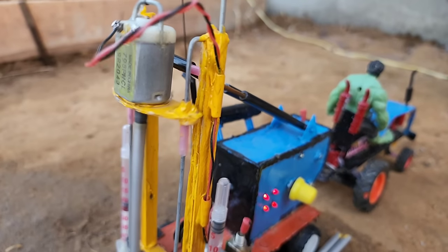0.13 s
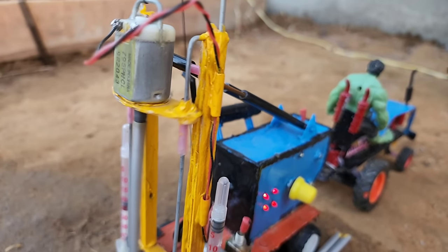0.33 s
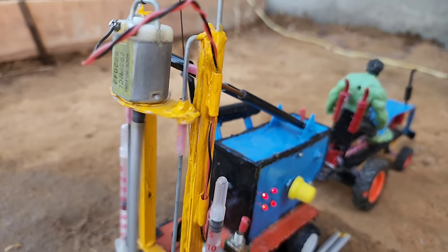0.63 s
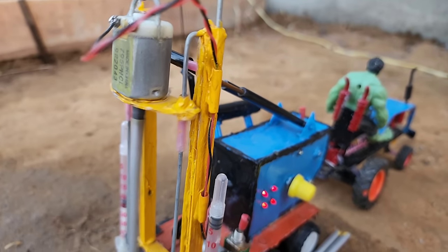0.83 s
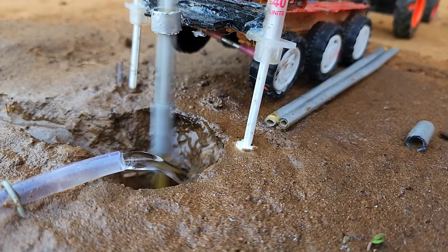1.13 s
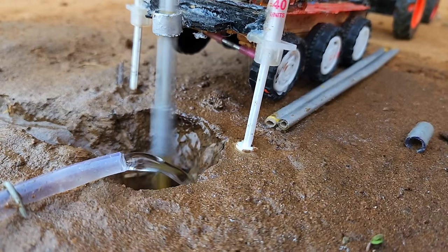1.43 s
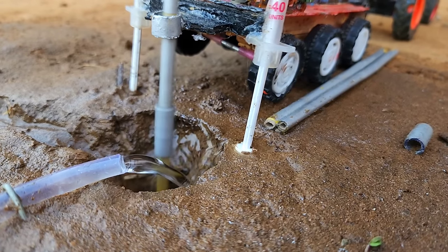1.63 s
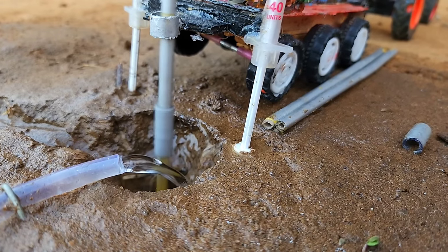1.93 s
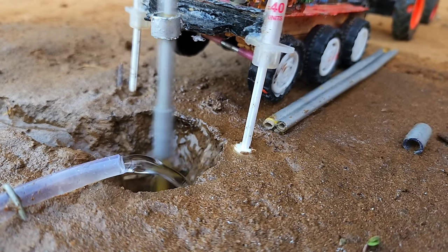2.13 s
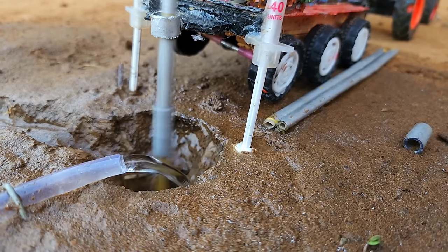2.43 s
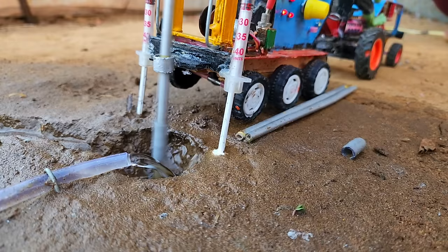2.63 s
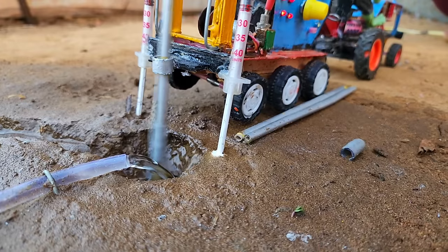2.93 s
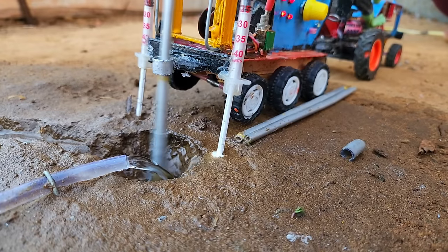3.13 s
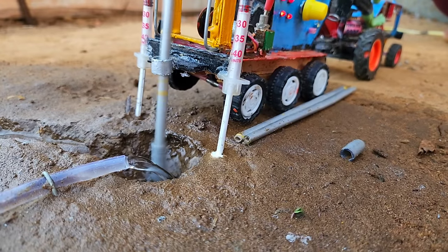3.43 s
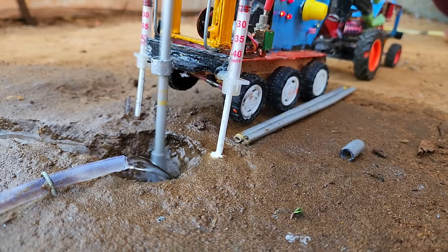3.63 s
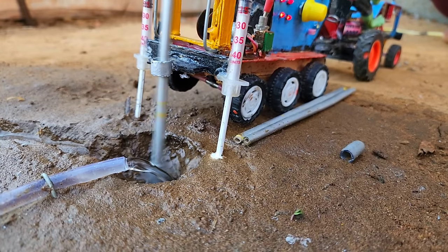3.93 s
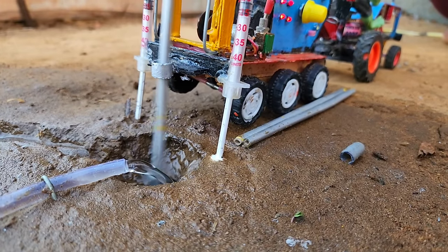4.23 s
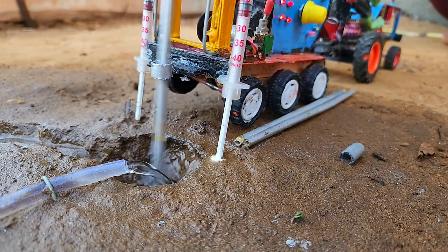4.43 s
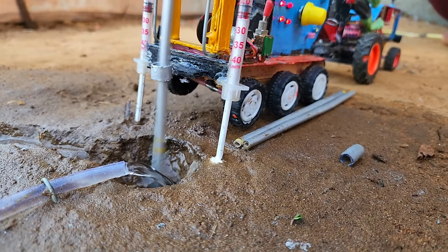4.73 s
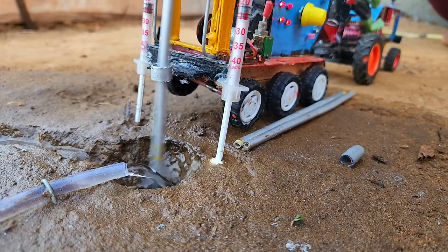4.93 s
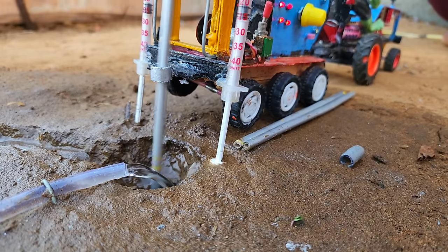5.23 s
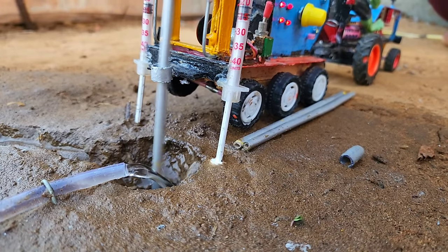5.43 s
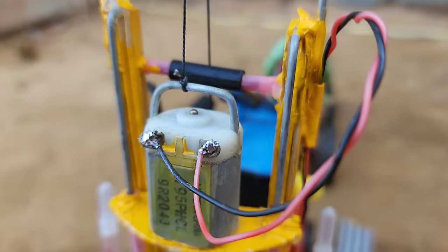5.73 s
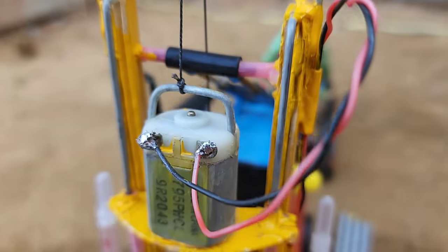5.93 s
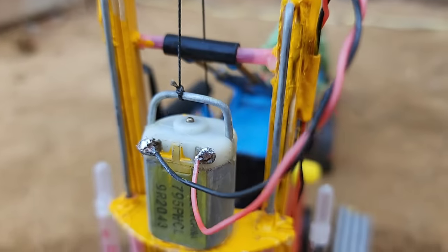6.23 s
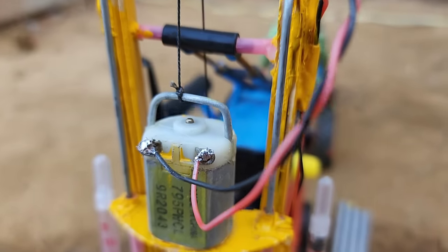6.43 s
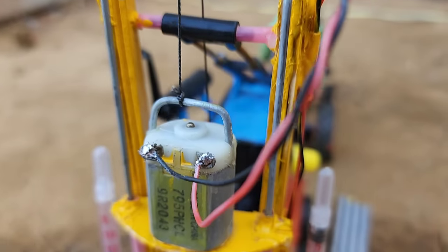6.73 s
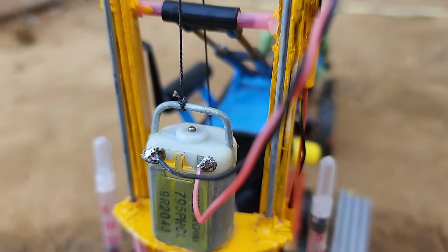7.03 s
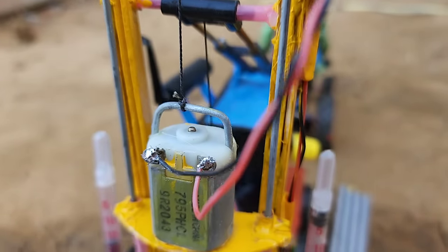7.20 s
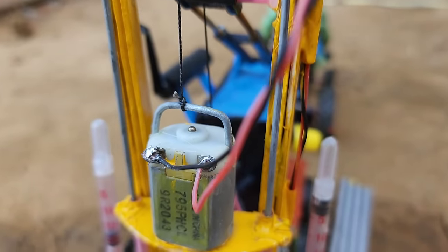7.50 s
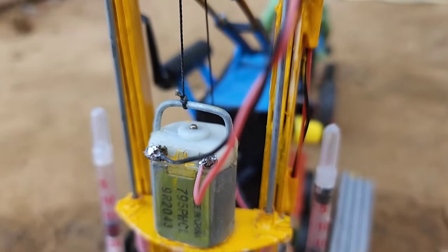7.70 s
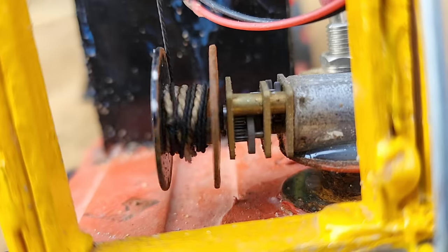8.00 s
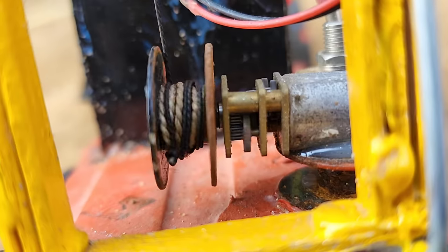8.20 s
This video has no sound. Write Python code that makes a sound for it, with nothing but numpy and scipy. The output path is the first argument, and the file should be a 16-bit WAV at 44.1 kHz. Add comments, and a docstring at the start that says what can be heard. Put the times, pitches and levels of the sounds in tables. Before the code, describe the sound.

In a quiet open yard, a toy drilling rig's little motor hums steadily, its loose rod chattering fast in the frame with fine brush crackle. After nearly six seconds a geared winch starts with a ringing kick, clatter and scraping, then whines much louder. The whine pulses as a load bounces, throbs gently, and changes colour near the end. Close microphone, dry, narrow stereo.

```python
"""A toy drilling rig works in wet sand, heard close up over faint yard air.
From the start a small DC motor hums, its loose rod knocks in the frame every turn, its brushes crackle.
At 5.8 s a geared winch motor starts with jolts and a scrape, and its tooth-rate whine spins up.
The string snaps taut at 5.9 s and the bouncing load pumps the whine; near 7 s the load sways and it throbs.
Around 7.4 s the whine changes colour as the microphone moves; a high side tone grows to the end."""
import sys
import numpy as np
from scipy import signal
from scipy.fft import rfft, irfft
from scipy.io import wavfile
from scipy.ndimage import uniform_filter1d

SR = 44100
rng = np.random.default_rng(int(sys.argv[2]) if len(sys.argv) > 2 else 0)


def output_pcm(signal):
    """Save a mono or channel-first signal as 16-bit PCM at the path in sys.argv[1].

    Samples are clipped to [-1, 1] before scaling.
    """
    pcm = np.clip(np.atleast_2d(signal).T, -1, 1) * 32767
    wavfile.write(sys.argv[1], SR, np.round(pcm).astype(np.int16))


N = 368676
TIME_S = np.arange(N) / SR


def gain_of(db):
    """Decibels to amplitude."""
    return 10 ** (np.asarray(db) / 20)


def evened(x):
    """Scale to rms 1."""
    return x / np.sqrt(np.mean(x ** 2) + 1e-20)


def curves(rows):
    """Interpolate each table column over time, sample by sample."""
    time_s, *columns = np.transpose(rows)
    return [np.interp(TIME_S, time_s, column) for column in columns]


def sine(cycles):
    """Sine of a phase in cycles."""
    return np.sin(2 * np.pi * cycles)


def wander(rate_hz):
    """Gaussian-lowpassed noise of rms 1, up to about rate_hz."""
    freq_hz = np.fft.rfftfreq(N, 1 / SR)
    spectrum = rfft(rng.standard_normal(N)) * np.exp(-(freq_hz / rate_hz) ** 2)
    return evened(irfft(spectrum, N))


def coloured(x, points, size=4096):
    """Minimum-phase filter with the given spectrum shape, scaled to unit energy."""
    point_hz, point_db = np.transpose(points)
    freq_hz = abs(np.fft.fftfreq(size, 1 / SR))
    shape_db = np.interp(np.log(freq_hz + 1), np.log(point_hz), point_db)
    log_gain = np.log(gain_of(shape_db))
    min_phase = np.exp(np.conj(signal.hilbert(log_gain)))
    response = np.fft.ifft(min_phase).real[:size // 2]
    return signal.oaconvolve(x, response / np.linalg.norm(response))[:N]


def resonate(x, freq_hz, width_hz):
    """One resonance of peak gain 1."""
    return signal.lfilter(*signal.iirpeak(freq_hz, freq_hz / width_hz, SR), x)


def ring_out(start_s, decay_s):
    """Sudden start, then exponential fall."""
    return (TIME_S >= start_s) * np.exp(-np.maximum(TIME_S - start_s, 0) / decay_s)


def partials(turns, orders, waver_db, waver_hz):
    """Lines on multiples of a rotation, each wavering in strength; rms 1 in sum."""
    total = np.zeros(N)
    for order, rel_db in orders:
        strength = gain_of(rel_db + waver_db * wander(waver_hz))
        total += strength * sine(round(order) * turns + rng.random())
    return evened(total)


# drill motor: time_s, turns_per_s
DRILL_SPEED = [(0.1, 55.76), (0.7, 55.68), (1.3, 55.59), (1.7, 55.62), (2.0, 56.05), (2.7, 56.08),
               (3.3, 56.02), (4.3, 55.9), (5.6, 55.79)]
# motor hum: multiple_of_shaft_rate, rel_db
DRILL_ORDERS = [(1, -24), (2, -16), (3, 2.5), (4, -2.5), (5, -6.5), (6, -11.5), (7, 2.5), (8, -5.5),
                (9, -5.5), (10, -5), (11, -6.5), (12, -12), (13, -12.5), (14, -15.5), (15, -33), (16, -7.5),
                (17, -3.5), (18, -4), (19, -28), (20, -28)]
# rod striking its guide: place_in_turn (0-1), rel_db, decay_s
ROD_CONTACTS = [(0.33, -5.5, 0.002), (0.74, 0.5, 0.0008), (0.79, 0.5, 0.0013), (0.93, -1.5, .0009)]
# hardest rod knocks: start_s, rel_db
HARD_KNOCKS = [(0.0314, -17), (0.3716, -15.5), (0.4962, -14), (0.5696, -16.5), (0.9472, -19), (2.0413, -14),
               (2.6481, -16.5), (3.7549, -16), (3.9515, -13), (5.0442, -15.5), (5.2048, -13),
               (5.4018, -14.5)]
# frame resonances: freq_hz, width_hz, rel_db
FRAME = [(1022, 137, -12.5), (1403, 72, -5), (1652, 237, -11), (1891, 79, -5.5), (2490, 80, -3.5),
         (2737, 47, -3), (3203, 98, -10.5), (4330, 460, -13.5), (4550, 1310, -17), (5000, 370, -17.5)]
# dry clack of the rod: freq_hz, rel_db_per_hz
CLACK = [(300, -23.5), (750, -17.5), (1050, -7.5), (1450, 1), (1900, 0.5), (2200, -16), (2680, 1),
         (3300, -8), (5000, -17), (12000, -42)]
# brushes crossing commutator gaps: place_in_turn (0-1), rel_db, decay_s
BRUSH_CONTACTS = [(.23, -11, .002), (.315, 3.5, .0004), (.38, -10, .003), (.53, 0, .0009), (.58, -1, .0009),
                  (.72, -9, .003)]
# brush crackle: freq_hz, rel_db_per_hz
SPARK = [(1500, -25), (4000, -3), (5300, -1), (7000, -5.5), (8700, -1), (10300, -3.5), (12500, 1),
         (15500, 1)]
HUM_DB, CLACK_DB = -45, -34.5
FRAME_LEFT_RIGHT_DB, CRACKLE_LEFT_RIGHT_DB = [[-32.3], [-32.9]], [[-39.2], [-41.5]]
HARD_KNOCK_DECAY_S = 0.0012


def drill():
    """Unbalance hums, the rod knocks in the frame and the brushes spark, all locked to the shaft."""
    turns = np.cumsum(curves(DRILL_SPEED)[0]) / SR
    hum = from_left(gain_of(HUM_DB) * partials(turns, DRILL_ORDERS, waver_db=1.0, waver_hz=2.9))

    # the rod grips and slips in the sand, so the knocking swells a little
    contact = chatter(turns, ROD_CONTACTS, scatter_db=1.5, jitter_turns=0.012) + 0.14
    knocking = gain_of(0.86 * wander(6.9)) * contact
    hard = sum(gain_of(rel_db + 32) * ring_out(start_s, HARD_KNOCK_DECAY_S)
               for start_s, rel_db in HARD_KNOCKS)
    strength = np.hypot(knocking, hard)

    knocks = at_ports(strength, direct=0.53, impact=5.2)
    frame = np.zeros((2, N))
    for k, (freq_hz, width_hz, rel_db) in enumerate(FRAME):
        # neighbouring modes alternate in sign
        frame += (-1) ** k * gain_of(rel_db) * resonate(knocks, freq_hz, width_hz)
    # the small frame radiates little bass
    frame = signal.sosfilt(signal.butter(2, 850, "high", fs=SR, output="sos"), frame)

    taps = at_ports(strength, direct=0.71, impact=1.05)
    clack = evened(np.array([coloured(port, CLACK) for port in taps]))

    # crackle strength, smoothed over 28 samples; brush pressure drifts
    contact = chatter(turns, BRUSH_CONTACTS, scatter_db=3.1, jitter_turns=0.012)
    smoothed = uniform_filter1d(contact, size=28)
    sparks = at_ports(gain_of(1.15 * wander(24)) * (smoothed + 0.17), direct=0.05, impact=0)
    crackle = evened(np.array([coloured(port, SPARK) for port in sparks]))

    rod = gain_of(FRAME_LEFT_RIGHT_DB) * evened(frame) + gain_of(CLACK_DB) * clack
    return hum + rod + gain_of(CRACKLE_LEFT_RIGHT_DB) * crackle


def chatter(turns, contacts, scatter_db, jitter_turns):
    """Contact strength, rms 1: each place is struck once a turn, never quite alike, and dies away."""
    turn = np.arange(int(turns[-1]) + 1)
    power = np.zeros(N)
    for place, rel_db, decay_s in contacts:
        late, force = np.clip(rng.standard_normal((len(turn), 2)), -2, 2).T
        at = np.searchsorted(turns, turn + place + jitter_turns * late)
        blow_power = gain_of(rel_db + scatter_db * force) ** 2
        blows = np.bincount(at, blow_power, N + 1)[:N]
        # power falls twice as fast as amplitude
        power += signal.lfilter([1], [1, -np.exp(-2 / (decay_s * SR))], blows + 1e-12)
    return evened(np.sqrt(power))


def at_ports(strength, direct, impact):
    """Blows and scraping at two ports: the direct share reaches the left first, the rest is scattered."""
    shared, left, right = strength * rng.standard_normal((3, N))
    # every jump in strength is a clean blow
    jumps = np.maximum(np.diff(strength, prepend=strength[0]), 0)
    shared = shared + impact * jumps
    return np.sqrt(direct) * from_left(shared) + np.sqrt(1 - direct) * np.array([left, right])


PORT_LAG_SAMPLES = 6


def from_left(x):
    """A sound that reaches the right port a few samples late."""
    return np.array([x, np.roll(x, PORT_LAG_SAMPLES)])


# tone at the tooth rate, before the offset and the strain, bounce, throb, flutter: time_s, base_db
TONE_LEVEL = [(6.2, -17), (6.41, -16), (6.43, -20), (6.79, -21.5), (6.82, -26), (6.85, -20), (7.21, -15.5),
              (7.74, -14), (8.34, -15)]
TONE_OFFSET_DB, STRAIN_DB, THROB_DB = 3.0, 6, 0.9
FLUTTER_DB, STRAIN_FLUTTER_DB = 0.8, 1.6
# the string snaps taut and the load bounces on it, pumping the tone less and less
TAUT_S, BOUNCE_HZ, BOUNCE_DB, BOUNCE_DECAY_S = 5.935, 11.7, 11, 0.16
# widest sway of the load, its rate, and its spread either side
SWAY_PEAK_S, SWAY_HZ, SWAY_SPREAD_S = 6.957, 10.15, 0.29
# low overtones together: time_s, base_db
LOW_LEVEL = [(6.17, -26.5), (6.22, -30), (7.08, -29), (7.35, -34.5), (7.81, -26), (7.95, -37),
             (7.98, -36.5), (8.34, -32)]
# low overtones: multiple_of_tooth_rate, early_rel_db, late_rel_db
LOW_OVERTONES = [(2, 0.5, -4.5), (3, -4, -7), (4, -8, -4)]
# high overtones: multiple_of_tooth_rate, early_db, late_db
OVERTONES = [(5, -41, -40.5), (6, -43, -42), (8, -48, -44), (9, -42, -40.5), (10, -46, -43.5),
             (11, -35.5, -40.5), (12, -45, -42.5), (13, -46, -47), (14, -48, -45), (15, -49.5, -49),
             (17, -54, -56), (19, -53.5, -57), (20, -53, -57)]
# gears scraping as they gather speed: multiple_of_tooth_rate, rel_db
SCRAPE = [(2, 12), (3, -5), (4, 6), (5, -8), (6, -20), (7, -17), (8, -17), (9, -10), (10, -6), (11, -8),
          (12, -1), (13, -4.5)]
# lines of the uneven pinion: multiple_of_shaft_rate, rel_db
SHAFT_ORDERS = [(5, -8), (7, -6.5), (8, -3.5), (9, -32), (10, -2), (12, -19), (13, -14), (20, -20), (21, 4),
                (24, -25), (26, -31), (27, 4)]
# pinion side tone: time_s, level_db
SIDE_TONE = [(7.9, -56), (8.05, -44), (8.36, -30)]
PINION_TEETH, SIDE_ORDER = 11, 24
# gear grinding: freq_hz, rel_db_per_hz
GRIND = [(25, -9), (90, -3), (250, -2), (430, 0.5), (570, 15), (760, -5), (1080, -0.5), (1650, -3.5),
         (2100, -0.5), (2750, 3.5), (3700, -2.5), (5500, -7.5), (8000, -11.5), (11500, -22.5), (15000, -28)]
# grinding eases steadily as the gears run in
GRIND_START_DB, GRIND_EASE_DB_PER_S, GRIND_STRAIN_DB = -28, 0.85, 2.3


def winch():
    """Pinion teeth mesh in a whine with overtones; the load bounces, then sways, and makes it throb."""
    start_s = JOLTS[0][0]
    # torque is high while the rotor gathers speed, and the gears scrape more than they sing
    strain = ring_out(start_s, decay_s=0.1545)
    meshing = 1 - ring_out(start_s, decay_s=0.098)
    eased = (1 - strain) ** 2

    # the bounce begins half a cycle before its peak
    bounce = ring_out(TAUT_S - 0.5 / BOUNCE_HZ, BOUNCE_DECAY_S)
    bounce = bounce * np.cos(2 * np.pi * BOUNCE_HZ * (TIME_S - TAUT_S))
    from_peak_s = TIME_S - SWAY_PEAK_S
    swing = np.exp(-(from_peak_s / SWAY_SPREAD_S) ** 2) * np.cos(2 * np.pi * SWAY_HZ * from_peak_s)
    # plus irregular sway throughout
    sway = swing + 0.45 * evened(resonate(rng.standard_normal(N), 10.8, 11.0))

    teeth = spin(start_s, strain, sway)
    pinion = teeth / PINION_TEETH

    tone_db = curves(TONE_LEVEL)[0] + TONE_OFFSET_DB
    tone_db = tone_db + STRAIN_DB * strain + BOUNCE_DB * bounce + THROB_DB * sway
    tone_db = tone_db + (FLUTTER_DB + STRAIN_FLUTTER_DB * strain) * wander(32)
    tone = meshing ** 2 * gain_of(tone_db) * np.sin(2 * np.pi * teeth + 0.057 * wander(37))

    octave, *others = (overtone(teeth, *row, flutter_db=3.0, drift_db=0.64) for row in LOW_OVERTONES)
    # the octave beats most deeply with the sway
    low = octave * (1 + 0.81 * sway) + sum(others) * (1 + 0.2 * sway)
    low = gain_of(curves(LOW_LEVEL)[0]) * low
    high = sum(overtone(teeth, *row, flutter_db=2.5, drift_db=2.2) for row in OVERTONES)

    # straining teeth catch and slip, which smears their lines
    slipping = partials(teeth + 0.045 * wander(110), SCRAPE, waver_db=4, waver_hz=60)
    scrape = gain_of(-27.0) * strain * slipping

    shaft = partials(pinion, SHAFT_ORDERS, waver_db=3.0, waver_hz=1.8)
    shaft = gain_of(-37.5 + 10 * strain) * shaft
    side_tone = gain_of(curves(SIDE_TONE)[0]) * sine(SIDE_ORDER * pinion)

    grind_db = GRIND_START_DB - GRIND_EASE_DB_PER_S * (TIME_S - start_s) + GRIND_STRAIN_DB * strain
    grind = gain_of(grind_db) * evened(coloured(flanks(teeth), GRIND))

    running = np.clip((TIME_S - start_s) / 0.0044, 0, 1)
    return running * (tone + eased * (low + high) + scrape + shaft + side_tone + grind)


# running speed under load: time_s, tooth_rate_hz
RUNNING_SPEED = [(6.0, 556), (6.12, 561.5), (6.3, 562.4), (6.42, 564.5), (7.25, 563.7), (7.76, 565.1),
                 (7.87, 566.4), (8.36, 566.6)]
# the winch starts at a share of its running speed and closes the gap exponentially
START_SHARE, SPIN_UP_S = 0.445, 0.05


def spin(start_s, strain, sway):
    """Teeth passed so far: the motor spins up, and its speed flutters with strain and sway."""
    spin_up = 1 - (1 - START_SHARE) * ring_out(start_s, SPIN_UP_S)
    rate_hz = curves(RUNNING_SPEED)[0] * spin_up
    flutter = 0.0017 * sway + (0.0016 + 0.044 * strain) * wander(77)
    return np.cumsum(rate_hz * (1 + flutter)) / SR


# the whine changes colour around this time, over this long, as the microphone moves
MOVE_S, MOVE_SPREAD_S = 7.43, 0.13


def overtone(teeth, multiple, early_db, late_db, flutter_db, drift_db):
    """One multiple of the tooth rate; it flutters, drifts, and shifts level as the microphone moves."""
    moved = 0.5 + 0.5 * np.tanh((TIME_S - MOVE_S) / MOVE_SPREAD_S)
    level_db = early_db + (late_db - early_db) * moved
    level_db = level_db + flutter_db * wander(37) + drift_db * wander(9.9)
    return gain_of(level_db) * sine(round(multiple) * teeth + rng.random())


def flanks(teeth, size=800):
    """Tooth flanks rub: their roughness recurs with every pinion turn, the rest is chance."""
    profile = rng.standard_normal(size)
    roughness = np.interp(teeth / PINION_TEETH, np.arange(size) / size, profile, period=1)
    rubbing = 0.4 * evened(roughness) + rng.standard_normal(N)
    # hardest as each tooth engages
    engaging = 1 + 0.5 * np.cos(2 * np.pi * teeth)
    return rubbing * engaging * gain_of(1.6 * wander(100))


# gears and string taking up slack: start_s, rattle_db, decay_s, thump_db (relative to rattle_db)
JOLTS = [(5.799, -28, 0.021, -14), (5.901, -17, 0.074, -1), (5.936, -13, 0.029, -4),
         (6.088, -17.5, 0.044, -13)]
# jolt clatter: freq_hz, rel_db_per_hz
CLATTER = [(30, -30), (90, -14), (200, 1), (320, 4.5), (620, 6.5), (780, -2.5), (1000, 1.5), (2700, -0.5),
           (4200, -9), (6000, -22), (12000, -53)]
# winch mount ringing at the kick: freq_hz, level_db, t60_s
MOUNT = [(404, -21, 0.55), (620, -10.5, 0.2), (3750, -19, 0.054), (4130, -24, 0.074)]
THUMP_HZ = 185


def jolts():
    """Each jolt clatters unevenly and thumps through the mast; the first, a kick, rings the mount."""
    out = np.zeros(N)
    for start_s, rattle_db, decay_s, thump_db in JOLTS:
        blow = ring_out(start_s, decay_s) - ring_out(start_s, decay_s=0.00055)
        rattle = gain_of(rattle_db + 2.8 * wander(350)) * blow * rng.standard_normal(N)
        thump = ring_out(start_s, decay_s=0.03) - ring_out(start_s, decay_s=0.003)
        thump = thump * sine(THUMP_HZ * (TIME_S - start_s))
        out += coloured(rattle, CLATTER) + gain_of(rattle_db + thump_db) * thump
    kick_s = JOLTS[0][0]
    for freq_hz, level_db, t60_s in MOUNT:
        ring = ring_out(kick_s, t60_s / np.log(1000)) - ring_out(kick_s, decay_s=0.0018)
        out += gain_of(level_db) * ring * sine(freq_hz * (TIME_S - kick_s))
    return out


# low drones under the load: start_s, pitch_hz, peak_db (before flutter), rise_s
DRONES = [(5.9, 93.6, -38, 0.11), (6.8, 137.6, -39.5, 0.066), (7.3, 92, -55.5, 0.65)]


def gear_buzz():
    """A gear wheel of the winch buzzes in low notes that swell and die."""
    out = np.zeros(N)
    for start_s, pitch_hz, peak_db, rise_s in DRONES:
        age = np.maximum(TIME_S - start_s, 0) / rise_s
        swell = age * np.exp(1 - age)
        out += gain_of(peak_db + 1.6 * wander(22)) * swell * sine(pitch_hz * TIME_S)
    return out


# yard air: freq_hz, rel_db_per_hz
AIR = [(25, -21), (55, 2), (90, -6), (180, -4), (300, 0.5), (520, 12), (730, -7), (1500, 12), (4000, -1),
       (15000, -18)]
AIR_DB, AIR_SIDE_REL_DB = -41.0, -14.5


def air():
    """Faint noise of the open yard, a little different at each port."""
    mid, side = (coloured(noise, AIR) for noise in rng.standard_normal((2, N)))
    return gain_of(AIR_DB) * (mid + gain_of(AIR_SIDE_REL_DB) * np.array([side, -side]))


def scene():
    """The drill runs throughout in the quiet yard; the winch joins dead centre."""
    return drill() + winch() + jolts() + gear_buzz() + air()


EDGE_HZ = 15620


def record(dry):
    """Band limit: a linear-phase lowpass at EDGE_HZ."""
    lowpass = signal.firwin(511, EDGE_HZ, window=("kaiser", 9), fs=SR)
    return signal.oaconvolve(dry, lowpass[None], "same")


dry = scene()
out = record(dry)
output_pcm(out)
```